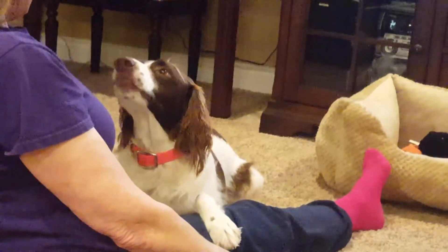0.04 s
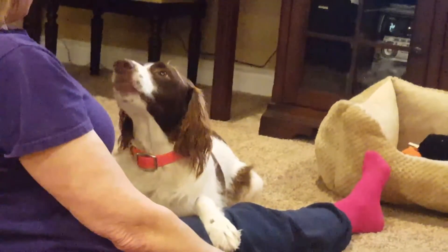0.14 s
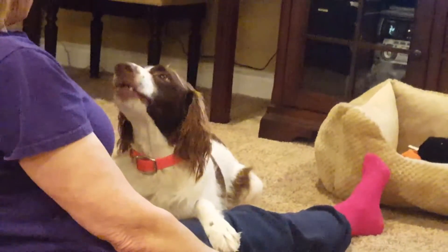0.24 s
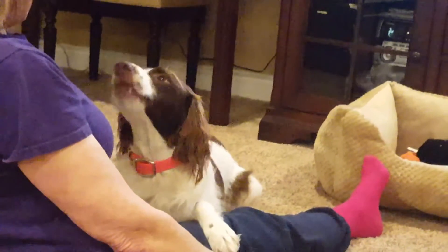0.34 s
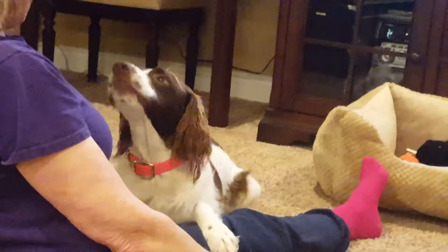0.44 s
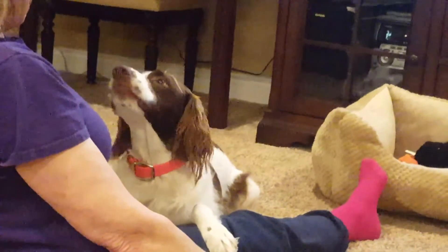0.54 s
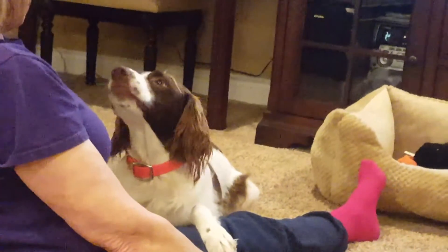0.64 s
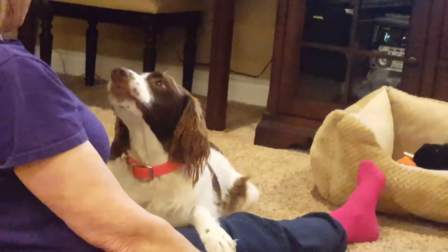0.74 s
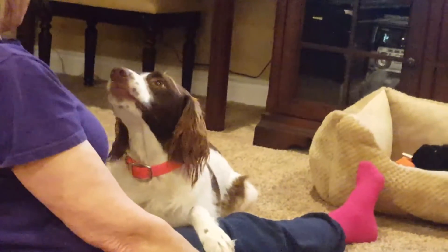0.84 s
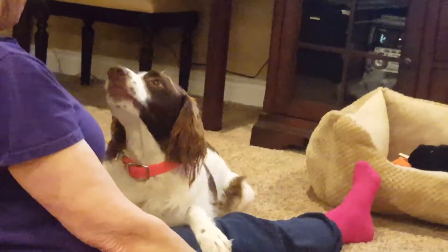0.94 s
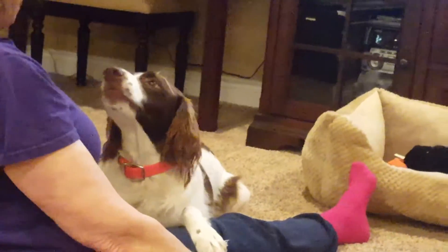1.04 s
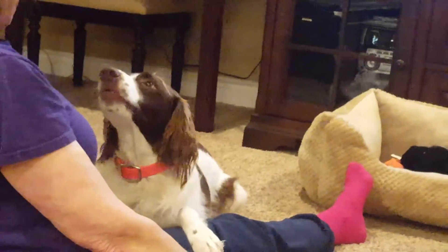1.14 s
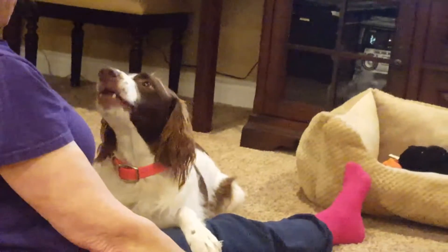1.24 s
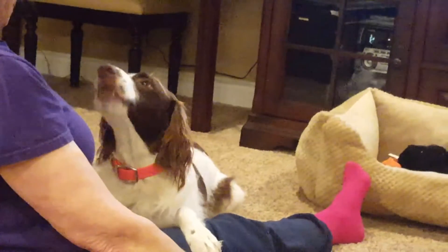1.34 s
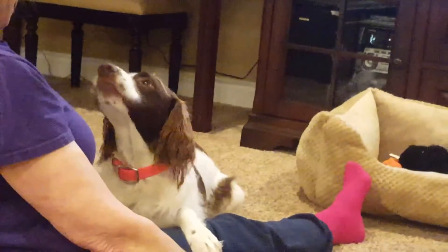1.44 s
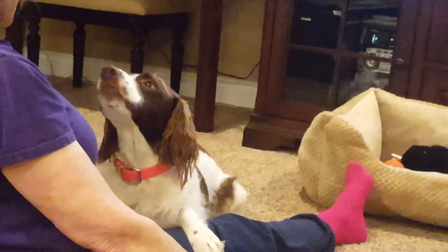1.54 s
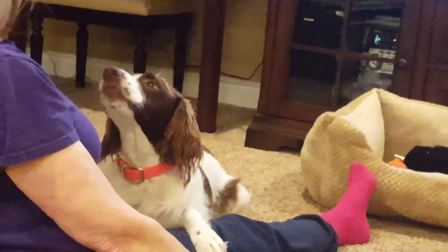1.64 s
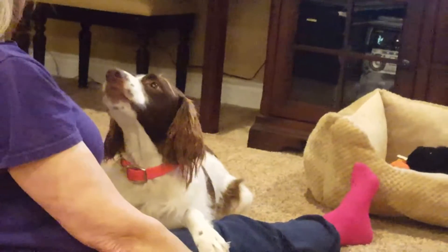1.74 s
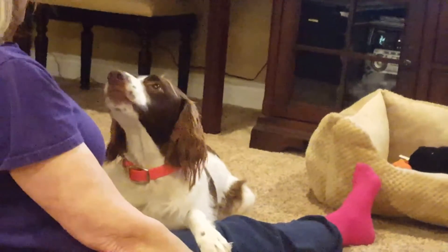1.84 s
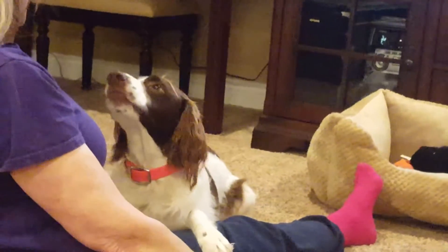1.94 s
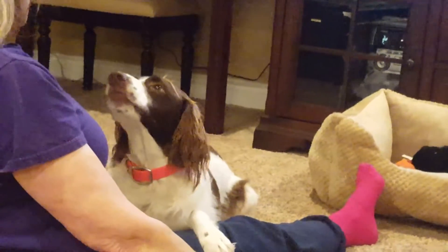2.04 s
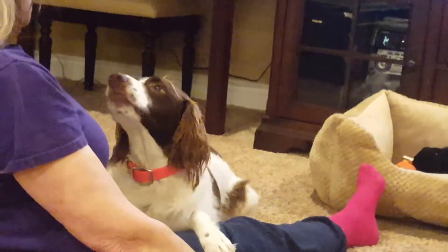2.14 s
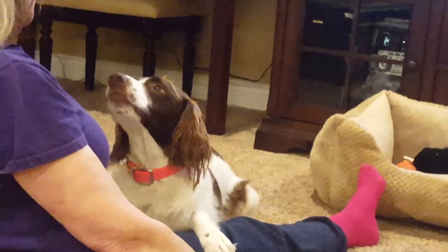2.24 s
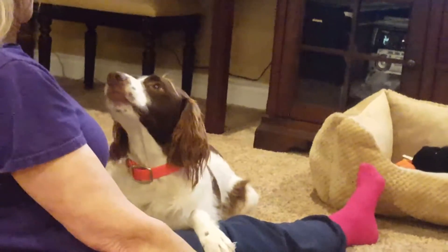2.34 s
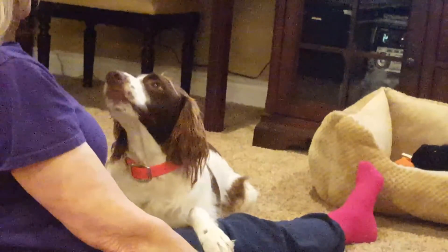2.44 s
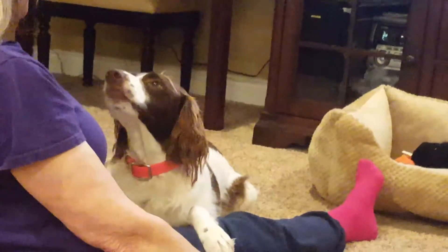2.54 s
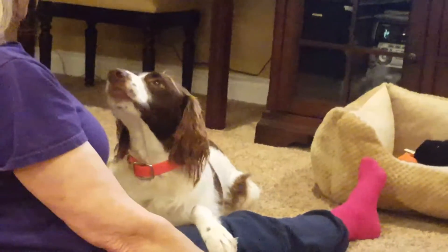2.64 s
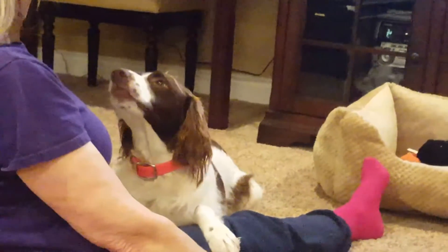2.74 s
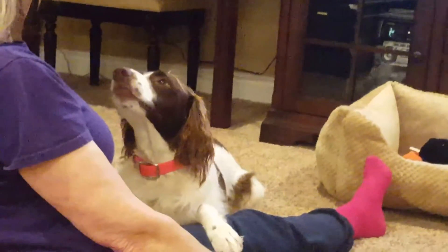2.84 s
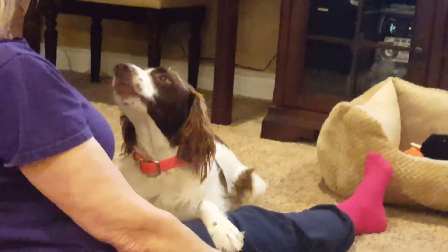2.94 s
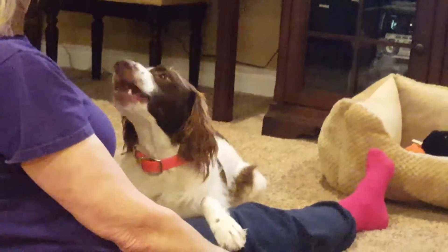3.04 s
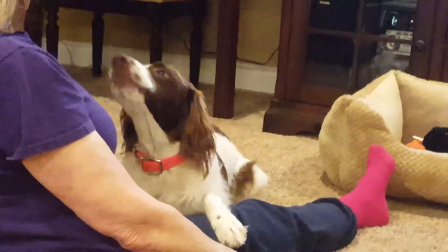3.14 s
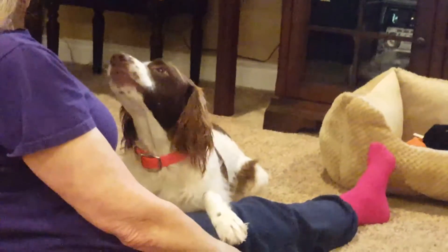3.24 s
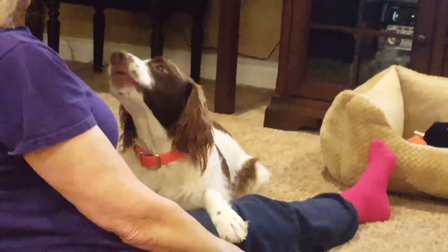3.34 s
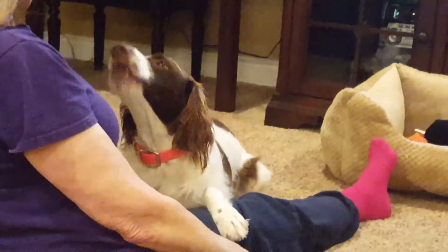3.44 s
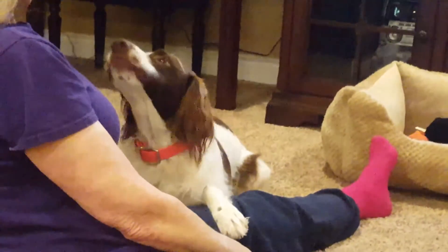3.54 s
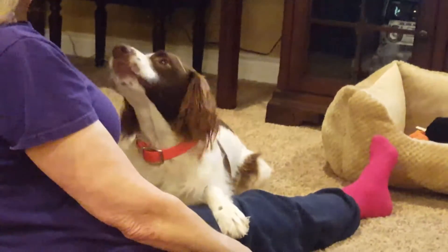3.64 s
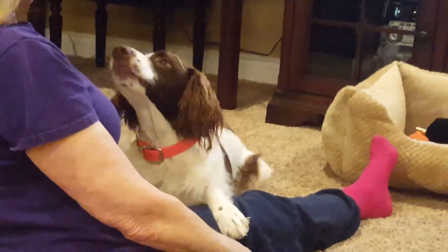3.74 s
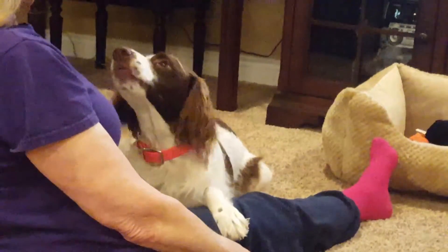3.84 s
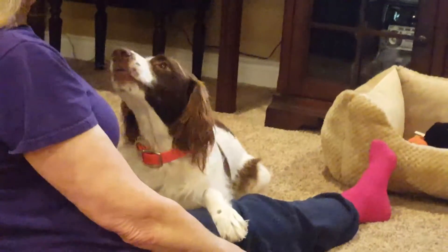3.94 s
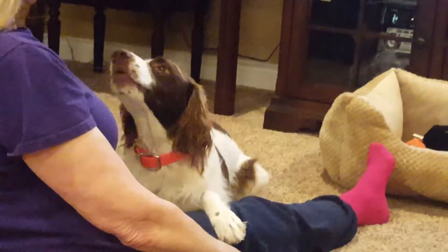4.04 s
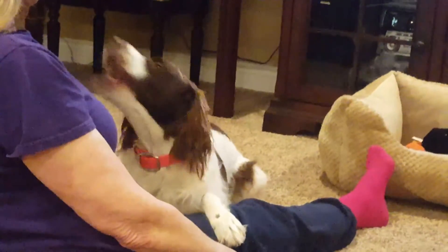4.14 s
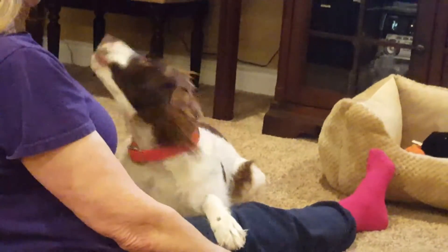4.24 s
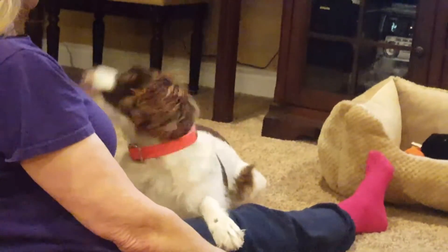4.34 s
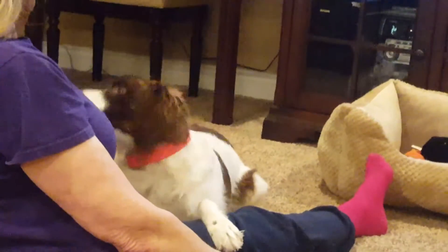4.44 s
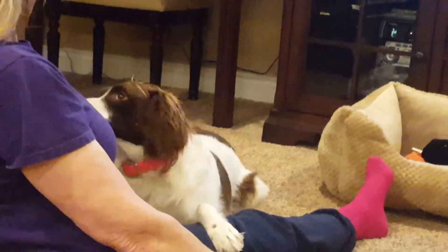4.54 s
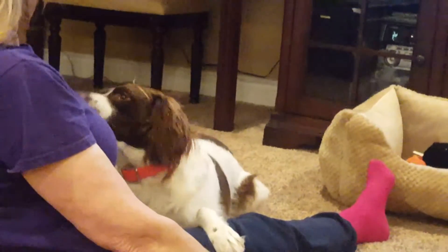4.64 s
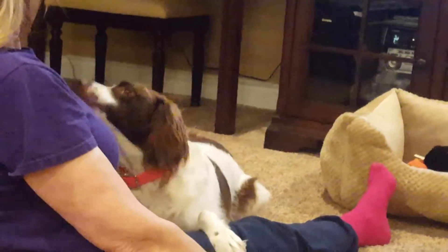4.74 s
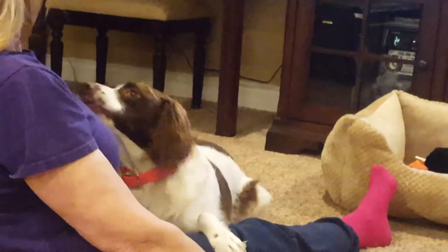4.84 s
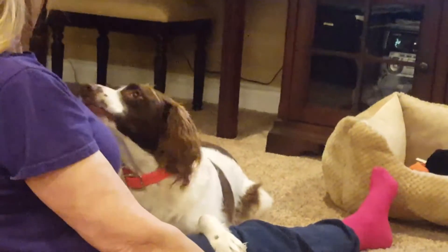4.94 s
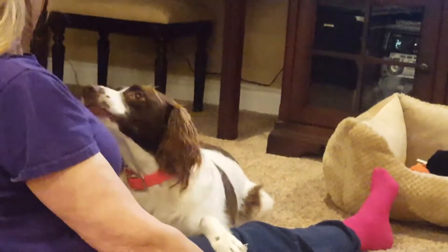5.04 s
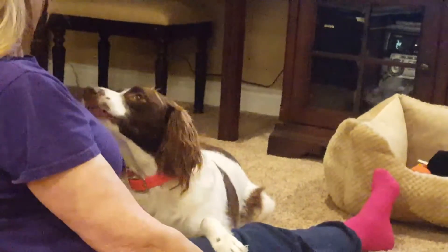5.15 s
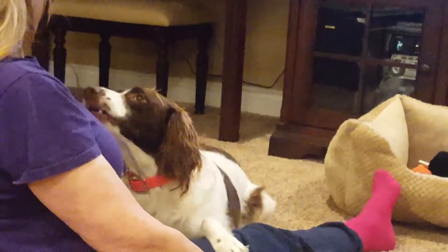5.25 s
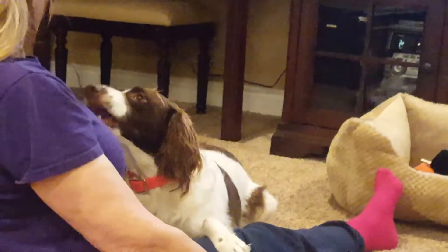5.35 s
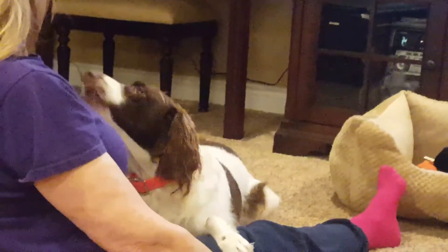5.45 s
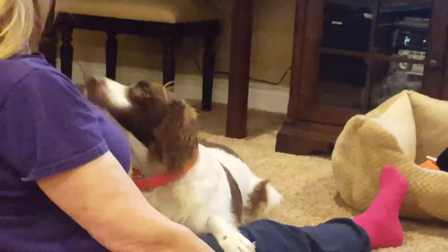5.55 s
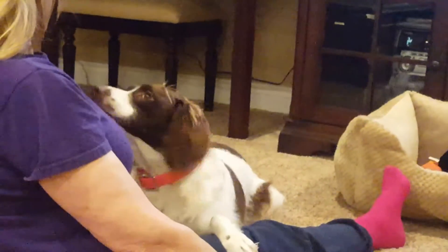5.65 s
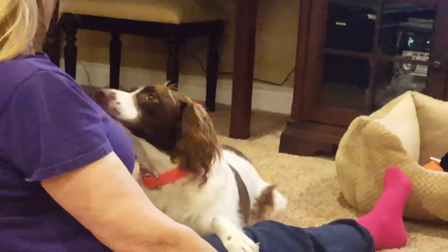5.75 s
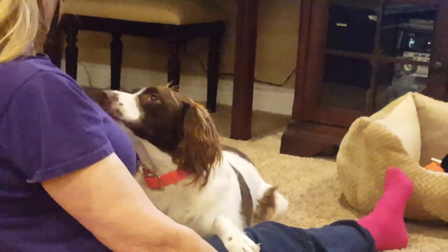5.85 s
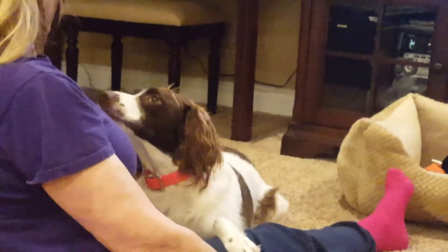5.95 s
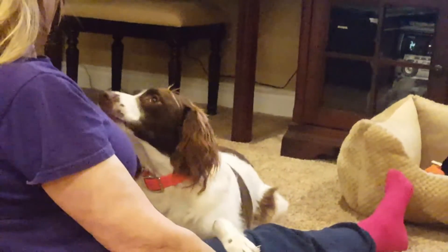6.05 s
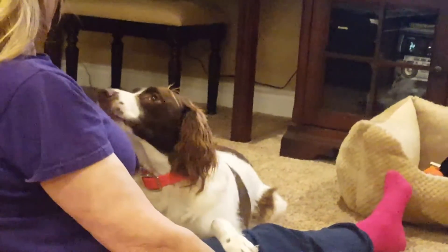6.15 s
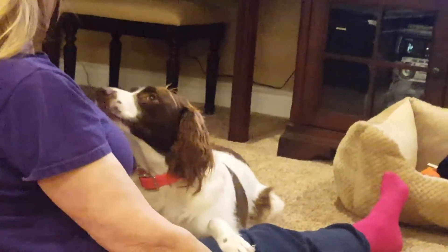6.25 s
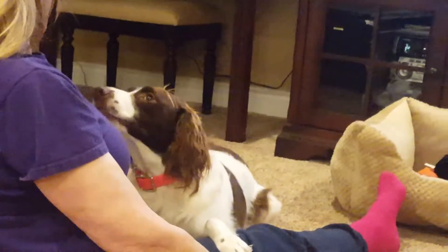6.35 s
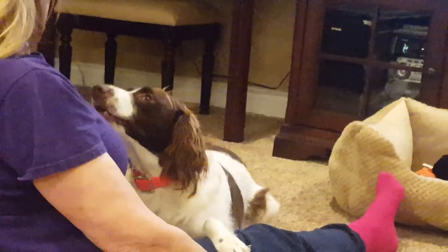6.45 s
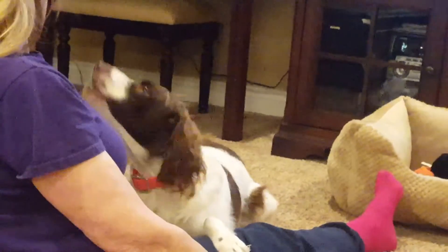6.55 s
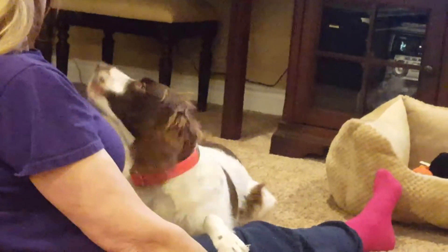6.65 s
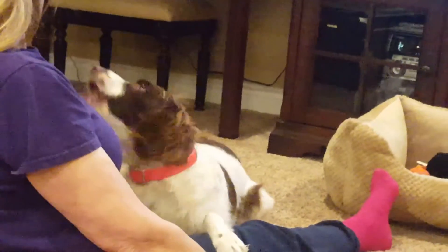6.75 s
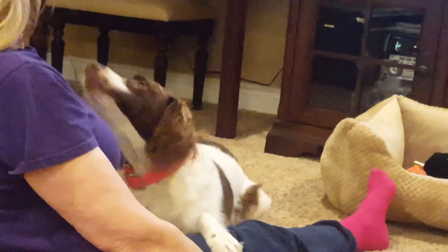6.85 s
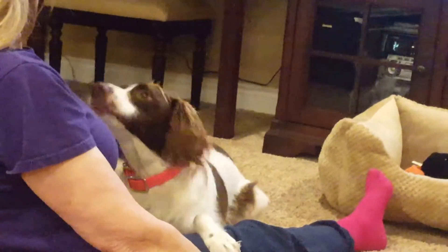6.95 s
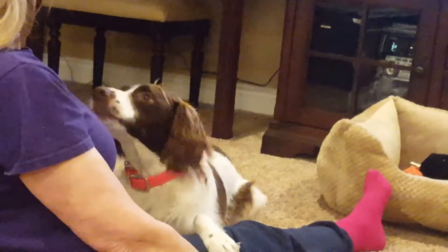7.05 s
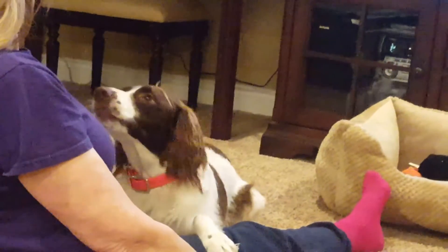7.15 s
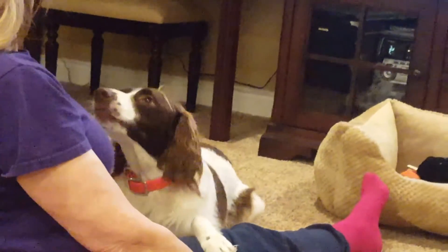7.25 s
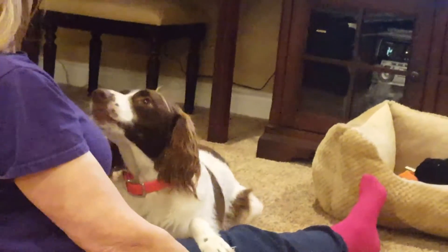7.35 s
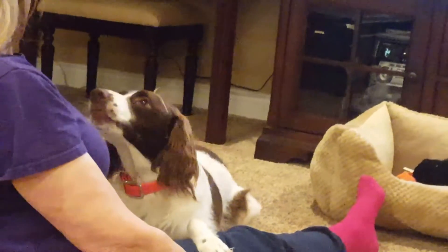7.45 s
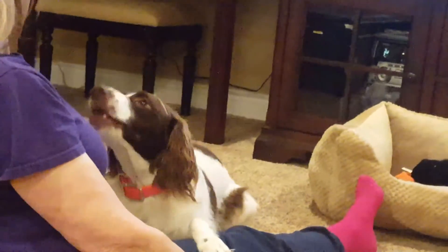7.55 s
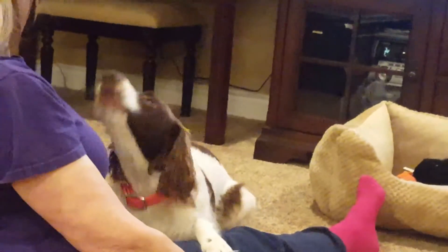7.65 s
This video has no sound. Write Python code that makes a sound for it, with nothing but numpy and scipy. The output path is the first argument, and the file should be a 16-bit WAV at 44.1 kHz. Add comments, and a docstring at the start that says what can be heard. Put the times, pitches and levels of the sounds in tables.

```python
"""A small dog lying on living-room carpet gives muffled woofs, then full barks.
Each call is a sweep in the pitch of its vocal folds, shaped by throat and mouth and mixed with breath.
Most end in a low chesty grumble as the mouth shuts. Its lips smack, it sniffs and its fur rustles.
A far wall returns a clear echo, the room rings for half a second, and a quiet hum and hiss lie below."""
import sys
import numpy as np
from scipy import signal
from scipy.fft import rfft, irfft, next_fast_len
from scipy.io import wavfile
from scipy.ndimage import uniform_filter1d

SR = 44100
rng = np.random.default_rng(int(sys.argv[2]) if len(sys.argv) > 2 else 0)


def generate_wav(sig):
    """Save sig (samples, or channels by samples) to the path in sys.argv[1] as 16-bit PCM at SR."""
    pcm = np.round(np.clip(np.atleast_2d(sig).T, -1, 1) * 32767).astype(np.int16)
    wavfile.write(sys.argv[1], SR, pcm)


N = 339570
CUTOFF_HZ = 15800   # top edge of the sound

# Woofs and barks: (time [s], climb [s], hold [s],
#   pitch at start / mid climb / top / end of hold [Hz],
#   level at entry / mid climb / late climb / top / one third / two thirds / end of hold [dB],
#   roughness of the hold [0-1], mouth opening [0-1], jaw boost [dB], treble boost [dB], snort [dB])
BARKS = [ (.339, 0.043, 0.026, 115.5, 145, 227.1, 218.4, -33, -28.5, -26, -23.5, -27.5, -27, -32, 0.31, 0.49, -1.5, -1.5, -39),
         (1.325, .048, 0.035, 124.1, 152.5, 186.2, 179.5, -40, -28, -24, -18.5, -26.5, -25.5, -31, 0.34, 0.66, -0.5, 1, -39.5),
         (3.093, 0.044, 0.057, 114.6, 135.6, 282.2, 303, -34, -29.5, -24, -21, -25, -32, -32.5, .28, 0.63, -2, -2, -45.5),
         (3.416, 0.061, 0.034, 126.8, 240.9, 491.5, 492, -49.5, -28.5, -24, -8.5, -4.5, -7.5, -16, 0.054, 0.74, 2, 0, -54.5),
         (4.176, 0.048, 0.053, 199.7, 397.7, 542.3, 490.2, -29.5, -24, -17.5, -5.5, -16.5, -6.5, -13.5, .04, 0.96, -1.1, 0.4, -55),
         (4.696, .048, 0.018, 141.8, 190.2, 239.7, 275.7, -44.5, -39.5, -40, -38.5, -42.5, -41.5, -43.5, 0.51, 0.6, 3.3, 1, -56),
         (5.415, .045, .057, 200.6, 368.4, 577.4, 578, -29.5, -19, -14, -9.5, -8.5, -9.5, -8, 0.19, 1, 4.5, 5, -45.5),
         (6.508, 0.073, 0.032, 132.8, 328.3, 503, 481, -36.5, -21.5, -21, -11.5, -11.5, -9, -16.5, 0.067, 0.89, .3, -2, -50.5),
         (6.741, 0.042, 0.071, 194.8, 399.9, 584, 480.5, -27, -17, -13.5, -7, -12.5, -10, -14.5, 0.27, 1, 3.5, 0.5, -51),
         (7.61, 0.047, .036, 136.6, 318.4, 524, 474.4, -38.5, -22.5, -22.5, -8, -10.5, -5, -11, 0.04, 0.87, -2.5, -0.7, -47),
         ]


def barks():
    """The dog pushes each bark out of its mouth, with a snort through its nose."""
    out = np.zeros(N)
    for *shape, jaw_db, treble_db, snort_db in BARKS:
        sound = voice(bark_course(*shape), jaw_db, treble_db)
        out[round(shape[0] * SR):][:len(sound)] += sound + snort(len(sound), snort_db)
    return out


def bark_course(start, climb, hold, start_hz, mid_hz, top_hz, end_hz,
                entry_db, mid_db, late_db, top_db, third_db, two_thirds_db, end_db, rough, mouth):
    """The vocal folds catch roughly, climb to a clearer held note, then let go."""
    top = start + climb
    return [(start, start_hz, entry_db - 12.5, .68, .63),
            (start + .005, start_hz, entry_db, .68, .63),   # the folds catch: a quick step up
            (start + climb / 2, mid_hz, mid_db, .52, mouth),
            (start + .78 * climb, mid_hz + .38 * (top_hz - mid_hz), late_db, max(.42, rough), mouth),
            (top, top_hz, top_db, rough, mouth),   # the voice locks on the note
            (top + hold / 3, 1.045 * top_hz, third_db, rough, mouth),   # the pitch bows up a little
            (top + 2 * hold / 3, top_hz, two_thirds_db, rough, mouth),
            (top + hold, end_hz, end_db, rough, mouth),
            (top + hold + .016, .7 * end_hz, end_db - 22, .3, .98)]   # pitch and level drop away


# Chesty grumbles once the mouth has shut:
# (time [s], length [s], start pitch [Hz], end pitch [Hz], start level [dB], end level [dB],
#   roughness [0-1])
GRUMBLES = [ (.398, 0.12, 165.4, 101.7, -34.5, -58, 0.32), (1.402, .12, 160, 97.2, -36.5, -50.5, 0.33),
            (3.185, .22, 144.7, 98, -32.5, -45, 0.4), (3.528, 0.1, 205.8, 210.7, -26, -50, 0.46),
            (4.292, .27, 155.3, 95.05, -29, -47.5, .25), (4.755, .125, 200.7, 90, -39.5, -51.5, .1),
            (6.644, 0.086, 153, 105.7, -27, -30.5, 0.35), (6.868, 0.041, 207.2, 206, -29, -59, 0.38), ]


def grumbles(swell_s=.025, fade_s=.02, mouth=.1):
    """The folds buzz behind a nearly shut mouth: the sound swoops down, swells, then fades."""
    out = np.zeros(N)
    for start, length, start_hz, end_hz, start_db, end_db, rough in GRUMBLES:
        early = start + swell_s + .39 * (length - swell_s)   # most of the change is over by now
        course = [(start, 1.7 * start_hz, start_db - 9.5),
                  (start + swell_s, start_hz, start_db),
                  (early, start_hz + .65 * (end_hz - start_hz), start_db + .65 * (end_db - start_db)),
                  (start + length, end_hz, end_db),
                  (start + length + fade_s, end_hz, end_db - 17)]
        sound = voice([(*point, rough, mouth) for point in course])
        out[round(start * SR):][:len(sound)] += sound
    return out


# How the throat shapes the voice, mouth open and mouth shut: (frequency [Hz], relative level [dB])
OPEN_MOUTH = [(80, -38.5), (250, -27.5), (400, -13.5), (490, -3.5), (570, 0), (660, -8), (850, -13),
              (1200, -9), (1500, -13.5), (1800, -17.5), (2200, -20), (2750, -20.5), (3300, -43),
              (4200, -66.5), (5200, -43), (6000, -49.5), (6800, -37.5), (8200, -58), (15000, -72.5)]
SHUT_MOUTH = [(60, -11.5), (140, 7.5), (300, -8), (560, -12.5), (900, -31), (1450, -43.5), (3000, -39.5),
              (4200, -50.5), (5500, -38.5), (8200, -65), (15000, -75.5)]


def voice(course, jaw_db=0, treble_db=0, jitter=.1, shimmer_db=5.5, breath_db=-23.5, lift=.21):
    """Buzzing vocal folds and puffs of rushing air, both shaped by the throat."""
    # course: (time [s], pitch [Hz], level [dB], roughness [0-1], mouth opening [0-1])
    times, *columns = np.transpose(course)
    t = np.arange(round(times[0] * SR), min(round(times[-1] * SR), N)) / SR
    pitch_hz, level_db, rough, mouth = [np.interp(t, times, column) for column in columns]
    short = np.exp(-((t - t[0]) / .035) ** 2)   # the throat starts short, ringing higher, then stretches
    shaky_hz = pitch_hz * (1 + jitter * rough * wobble(90, len(t)))
    phase = 2 * np.pi * np.cumsum(shaky_hz) / SR
    harmonic = np.arange(1, 41)[:, None]   # whole multiples of the pitch
    step = 16   # samples between updates of the throat shape
    hz, opening = harmonic * pitch_hz[::step], mouth[::step]
    open_db = at_hz(OPEN_MOUTH, hz / (1 + lift * short[::step] * (hz < 2200)))
    open_db += effort_db(hz, jaw_db, treble_db)
    gains = amp(opening * open_db + (1 - opening) * at_hz(SHUT_MOUTH, hz)) * (hz < CUTOFF_HZ)
    gains /= np.sqrt(np.sum(gains ** 2, axis=0) / 2)
    gains = np.repeat(gains, step, axis=1)[:, :len(t)]
    smear = rng.uniform(-2.22, 2.0, harmonic.shape)   # the throat rings on, so harmonics peak apart
    buzz = np.sum(gains * np.sin(harmonic * phase + smear), axis=0)
    # rushing air is brighter than the folds, by 4 dB an octave
    hiss = [(f, db + 4 * np.log2(f / 500) + effort_db(f, jaw_db, treble_db)) for f, db in OPEN_MOUTH]
    lifted_hiss = sorted((f * (1 + lift * (f < 2000)), db) for f, db in hiss)
    open_air = np.sqrt(short) * shaped_noise(lifted_hiss, len(t))
    open_air += np.sqrt(1 - short) * shaped_noise(hiss, len(t))
    air = mouth * open_air + .88 * (1 - mouth) * shaped_noise(SHUT_MOUTH, len(t))
    puffs = 1 + .5 * np.cos(phase)   # more air passes while the folds are apart
    breath = (rough + amp(breath_db)) * puffs * air
    flutter = amp(shimmer_db * rough * wobble(36, len(t)))
    return amp(level_db) * flutter * (np.sqrt(1 - rough ** 2) * buzz + breath)


def effort_db(hz, jaw_db, treble_db, jaw_hz=1150, treble_hz=2000):
    """A wide jaw rings in the middle range, and a hard push brightens the treble."""
    jaw = jaw_db * np.exp(-(np.log(hz / jaw_hz) / .3) ** 2)
    return jaw + treble_db / (1 + (treble_hz / hz) ** 4)


def snort(size, db, nose_hz=5320, width_hz=510, flare_s=.0089, rise_s=.0099, fall_s=.02):
    """A burst of air rings in the nostrils, rising in pitch as they flare."""
    t = np.arange(size) / SR
    centre_hz = nose_hz * (1 - .12 * np.exp(-t / flare_s))
    phase = 2 * np.pi * np.cumsum(centre_hz) / SR
    smooth = signal.butter(2, width_hz / 2, fs=SR, output="sos")
    drift = signal.sosfilt(smooth, rng.standard_normal((2, size)))
    air = unit_level(drift[0] * np.cos(phase) + drift[1] * np.sin(phase))
    return amp(db) * (1 - np.exp(-t / rise_s)) * np.exp(-t / fall_s) * air


# Lips and tongue smacking: (time [s], level [dB], pitch [Hz])
SMACKS = [(1.304, -33, 2040), (2.704, -35, 3870), (2.757, -44.5, 6500), (2.8394, -57, 3280),
          (2.8594, -50, 5830), (3.054, -32, 1940), (3.786, -54, 1470), (4.131, -43, 6870),
          (4.1525, -27.5, 2840), (4.6592, -36.5, 1660)]


def smacks(rise_s=.0014, ring_s=.005):
    """Wet clicks: the hollow of the mouth rings briefly, with noise on top."""
    out, t = np.zeros(N), np.arange(1500) / SR
    for start, db, hz in SMACKS:
        ring = np.sin(2 * np.pi * hz * t) * np.minimum(t / rise_s, 1)
        wetness = .81 + .5 * wobble(900, len(t))
        out[round(start * SR):][:len(t)] += amp(db - 60 * t / ring_s) * ring * wetness
    return out


# Sniffs, and fur rustling as the dog turns its head:
# (peak time [s], length [s], level [dB], centre [Hz], width each way [share of centre])
SOFT_HISSES = [(1.945, 0.15, -66.5, 4900, .25), (2.407, 0.093, -67, 1990, 0.2),
               (4.48, 0.5, -65, 6100, 0.22), (4.774, 0.09, -70, 8960, .5), (5.081, 0.12, -71.5, 5400, 0.14)]


def soft_hisses():
    """Sniffs and fur rustle, each a band of hiss that swells and fades."""
    out, t = np.zeros(N), np.arange(-SR // 3, SR // 3) / SR
    for peak_s, length, db, hz, width in SOFT_HISSES:
        band = signal.butter(1, [hz * (1 - width), hz * (1 + width)], "band", fs=SR, output="sos")
        hiss = unit_level(signal.sosfilt(band, rng.standard_normal(len(t))))
        swell = np.exp(-(2 * t / length) ** 2)
        out[round(peak_s * SR) - SR // 3:][:len(t)] += amp(db) * swell * hiss
    return out


# The room's ringing: (frequency [Hz], time to fade by 60 dB [s], level [dB])
ROOM_RING = [(60, .5, -25), (170, 0.31, -19.5), (300, 0.26, -16.5), (490, 0.46, -2.5), (960, 0.57, -1),
             (1760, 0.57, 0), (2800, 0.57, -2), (5400, .46, 0.5), (10100, 0.14, -4.5), (16190, .35, -8.5)]
# Bounces off the walls: (left delay [s], left level [dB], right delay [s], right level [dB])
WALL_ECHOES = [(.0045, -12, .0048, -9), (.018, -11, .0176, -14), (.034, -13, .0344, -13),
               (.051, -6, .0513, -7), (.085, -14, .0846, -15)]


def living_room(sound, build_up_s=.0056, wall_cut_hz=3900, pan_db=2, right_lag_s=.00007):
    """Sound arrives directly, then as wall echoes and a ringing that dies away band by band."""
    hz, noise = stereo_noise(SR)
    t, response = np.arange(SR) / SR, np.zeros((2, SR))
    for centre_hz, ring_s, db in ROOM_RING:
        share = at_hz([(f, f == centre_hz) for f, *_ in ROOM_RING], hz)   # the bands add up to 1
        fade = amp(-60 * t / ring_s) * (1 - np.exp(-t / build_up_s))
        response += amp(db) * irfft(noise * share, SR) * fade / np.sqrt(np.sum(fade ** 2))
    echoes = np.zeros((2, SR))
    for left_s, left_db, right_s, right_db in WALL_ECHOES:
        echoes[0, round(left_s * SR)] = amp(left_db)
        echoes[1, round(right_s * SR)] = amp(right_db)
    # furnished walls return little treble
    response += signal.lfilter(*signal.butter(1, wall_cut_hz, fs=SR), echoes)
    response[0, 0] += amp(pan_db / 2)   # the direct sound is earlier and louder on the left
    response[1, round(right_lag_s * SR)] += amp(-pan_db / 2)
    return signal.fftconvolve(sound[None], response, axes=1)[:, :N]


# The room's steady rumble and hiss: (frequency [Hz], relative level [dB])
ROOM_HISS = [(20, -20), (35, -19.5), (50, -0.5), (65, -5), (160, -8.5), (250, -6), (400, -13), (700, -18.5),
             (1300, -19), (3000, -26.5), (4500, -29.5), (5400, -27), (6000, -32), (9000, -41),
             (12500, -35.5), (15600, -35.5)]


def room_tone(hiss_db=-61, hum_hz=50, hum_db=-69.5):
    """Steady hiss and rumble, with a wavering hum from the mains power."""
    size = next_fast_len(N)
    hz, noise = stereo_noise(size)
    hiss = unit_level(irfft(noise * amp(at_hz(ROOM_HISS, hz)), size)[:, :N])
    hum = np.sqrt(2) * np.sin(2 * np.pi * hum_hz * np.arange(N) / SR)
    return amp(hiss_db) * hiss + amp(hum_db + 2.7 * wobble(3, N)) * hum


# How alike the room sounds on the left and right: (frequency [Hz], likeness [-1 to 1])
LIKENESS = [(50, 1), (300, 0.0097), (600, 0.65), (1000, -0.16), (2600, -0.06), (15000, 0.65)]


def stereo_noise(size):
    """Frequencies and spectra of left and right noise, most alike in the deep bass."""
    hz = np.fft.rfftfreq(size, 1 / SR)
    alike = at_hz(LIKENESS, hz)
    mid, side = rfft(rng.standard_normal((2, size))) * np.sqrt([(1 + alike) / 2, (1 - alike) / 2])
    return hz, np.array([mid + side, mid - side])


def shaped_noise(spectrum, size):
    """Noise whose tone follows (frequency [Hz], relative level [dB]) points."""
    padded = next_fast_len(size + 2048)
    gains = amp(at_hz(spectrum, np.fft.rfftfreq(padded, 1 / SR)))
    return unit_level(irfft(rfft(rng.standard_normal(padded)) * gains, padded)[:size])


def wobble(hz, size):
    """A random wander of typical size 1, mostly slower than hz."""
    pole = np.exp(-2 * np.pi * hz / SR)
    wander = signal.lfilter([1], [1, -2 * pole, pole * pole], rng.standard_normal(size + 2000))
    return unit_level(wander[2000:])


def at_hz(points, hz):
    """Read between a table's rows, with octaves evenly spaced."""
    frequencies, values = np.transpose(points)
    return np.interp(np.log(np.maximum(hz, 1)), np.log(frequencies), values)


def unit_level(x):
    """Scale a signal to an average power of 1."""
    return x / np.sqrt(np.mean(x ** 2) + 1e-20)


def amp(db):
    """Turn decibels into a multiplier."""
    return 10 ** (np.asarray(db) / 20)


def scene(low_cut_hz=83):
    """The dog in the room, over hum and hiss; the deepest bass is cut from its calls."""
    bass_cut = signal.butter(4, low_cut_hz, "high", fs=SR, output="sos")
    calls = signal.sosfilt(bass_cut, barks() + grumbles())
    return living_room(calls + smacks() + soft_hisses()) + room_tone()


def record(dry, loud_db=-24, squeeze=.11, recover_db_per_s=1):
    """The volume dips on loud calls and creeps back; peaks are rounded and the highest treble is cut."""
    level_db = 10 * np.log10(uniform_filter1d(np.mean(dry ** 2, axis=0), size=441) + 1e-12)
    recovery = recover_db_per_s * np.arange(N) / SR
    cut_db = np.maximum.accumulate(squeeze * np.maximum(level_db - loud_db, 0) + recovery) - recovery
    evened = dry * amp(-uniform_filter1d(cut_db, size=441))
    rounded = 1.15 * np.tanh(evened / 1.15)
    return signal.sosfilt(signal.cheby2(20, 60, CUTOFF_HZ, fs=SR, output="sos"), rounded)


dry = scene()
out = record(dry)
generate_wav(out)
```